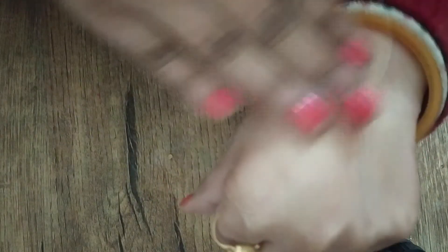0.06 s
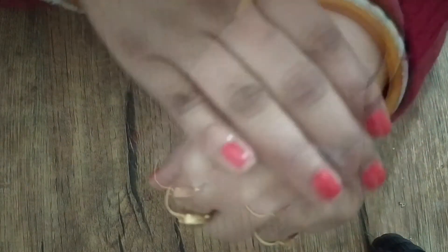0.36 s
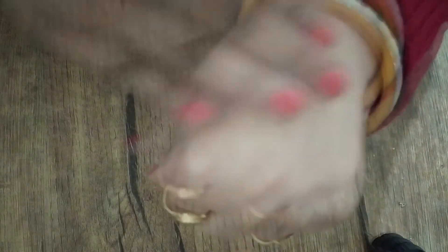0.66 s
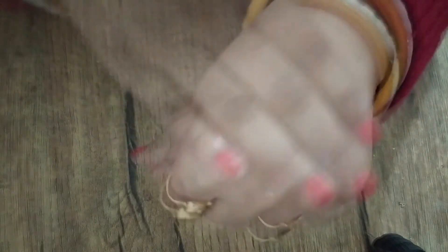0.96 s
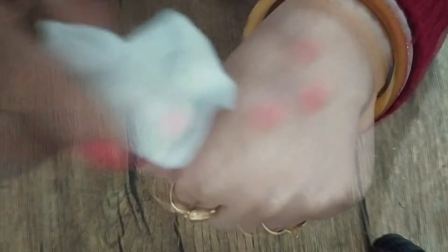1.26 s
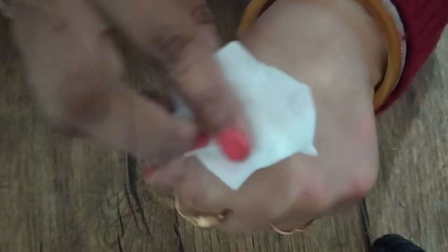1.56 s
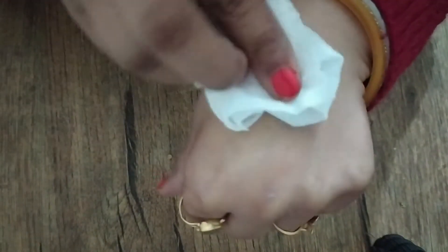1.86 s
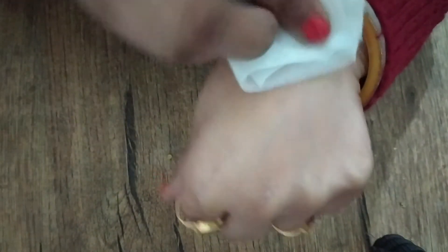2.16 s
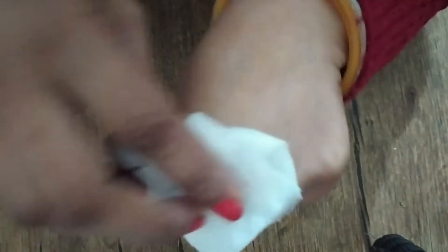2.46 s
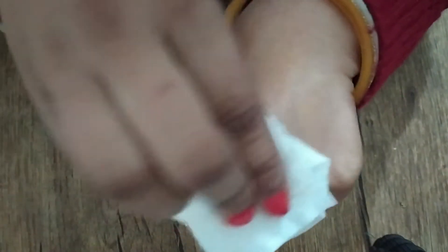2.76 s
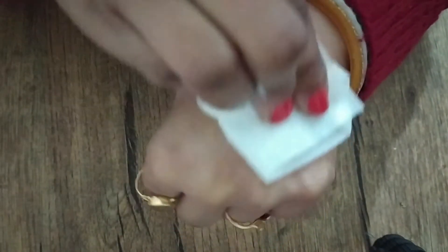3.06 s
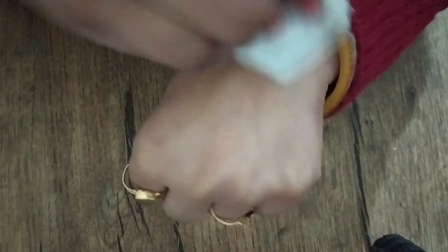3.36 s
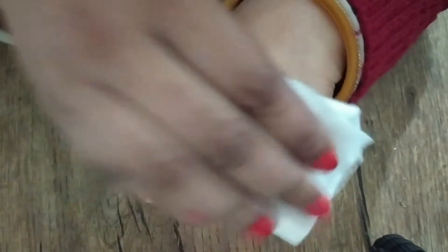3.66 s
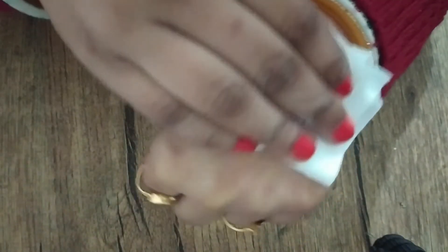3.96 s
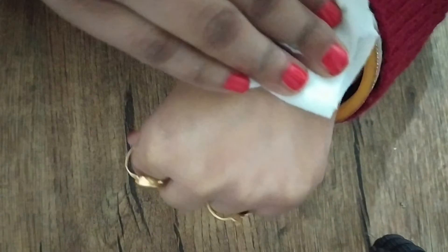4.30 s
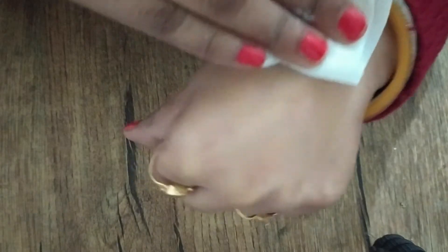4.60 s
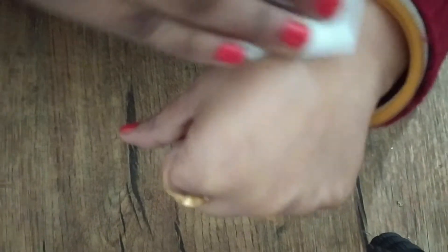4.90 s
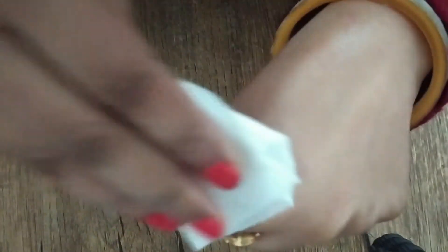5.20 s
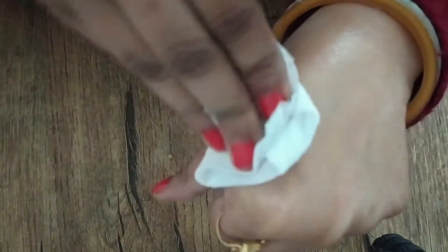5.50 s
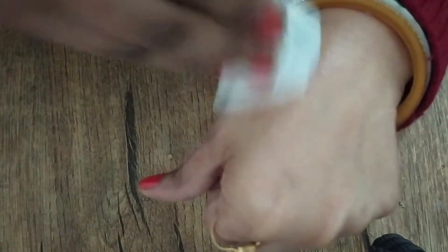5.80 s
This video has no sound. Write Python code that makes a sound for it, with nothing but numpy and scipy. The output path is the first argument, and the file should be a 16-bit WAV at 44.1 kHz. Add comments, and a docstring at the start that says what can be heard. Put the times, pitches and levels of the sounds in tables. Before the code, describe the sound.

A quiet, close stereo sound in a small room with a faint low hum. From the start to about 1.3 seconds, bare fingers spread cream over a hand in soft, dull, swishing strokes, while the wooden table rumbles and drones faintly under the forearms. At 0.9 seconds the table takes one clear, soft bump. Bangles clink lightly around 1.2 seconds, high and short, damped by the wrist. From about 1.8 seconds a tissue wipes the skin in uneven strokes, two or three a second, with a papery rasp and fine hiss. The bangles jangle most strongly from 2.3 to 2.5 seconds and again from 3.5 to 3.7, slightly to the left. The wiping turns gentler after 4 seconds, with a brighter stroke at 5. A few more clinks come around 5.3 seconds, and a last scratchy wipe near 5.9.

```python
"""Hand cream, tissue and bangles

Close up in a small room, on a spaced pair of microphones. A hand spreads cream over the back of the
other, then wipes it off with a tissue: skin and paper fibres rub in strokes of tiny slips. Bangles
clink and jangle as the arm moves, damped by the wrist. The wooden table rumbles under the forearms
and takes one clear bump. A faint room hum lies underneath."""
import sys
import numpy as np
from scipy import signal
from scipy.fft import rfft, irfft, next_fast_len
from scipy.io import wavfile
from scipy.ndimage import uniform_filter1d

SR = 44100
rng = np.random.default_rng(int(sys.argv[2]) if len(sys.argv) > 2 else 0)


def inscribe(sig):
    """Save sig as 16-bit PCM at rate SR to the path in sys.argv[1].

    A 1-D sig is mono; a 2-D sig holds one channel per row.
    Samples are clipped to [-1, 1] before scaling.
    """
    pcm = np.round(np.clip(np.atleast_2d(sig).T, -1, 1) * 32767)
    wavfile.write(sys.argv[1], SR, pcm.astype(np.int16))


N = 261998

# how alike the two microphones hear a noise: (frequency [Hz], correlation [-1 to 1])
MIC_CORRELATION = [(25, 0.0043), (70, 0.6), (200, 0.45), (400, 0.37), (700, 0.21), (1500, -0.036),
                   (9000, 0.0041), (16000, 0.051)]
# room tone: (frequency [Hz], relative density [dB])
ROOM_SPECTRUM = [(15, 17), (36, -9.5), (70, -13.5), (101, -9), (168, -15.5), (446, -19.5), (759, -21.5),
                 (1400, -28), (2460, -27.5), (5230, -32), (7500, -35.5), (9400, -33), (11500, -33.5),
                 (13000, -44), (15500, -57)]
# hum in the room: (frequency [Hz], level [dB], resonator width [Hz])
HUM_BANDS = [(57.8, -69.5, 12), (109.6, -81, 5.9), (162.9, -70.5, 14.7)]
# forearms shifting on the table: (time [s], half length [s], relative level [dB])
FOREARM_SHIFTS = [(0.1, 0.85, -56), (1.123, 0.058, -50), (2.745, 0.18, -54), (4.732, 0.043, -53),
                  (5.84, 0.064, -59)]
# their rumble: (frequency [Hz], relative density [dB])
FOREARM_SPECTRUM = [(22, -10), (40, 4), (56, 20.5), (85, 4), (120, 3.5), (200, -28)]
# the table droning under the rubbing: (peak time [s], half length [s], frequency [Hz], level [dB])
TABLE_DRONES = [(0.155, 0.093, 113.1, -56.5), (0.374, 0.035, 149, -50.5), (0.513, 0.11, 110, -54.5),
                (0.578, 0.048, 150.2, -46), (0.82, 0.18, 155, -55.5), (1.02, 0.089, 170, -52.5),
                (1.2, 0.046, 148, -58), (1.538, 0.065, 149.6, -60), (1.96, 0.067, 163, -57),
                (2.332, 0.22, 165.3, -61.5), (2.82, .07, 99.8, -61), (3.816, .014, 180, -51.5),
                (4.168, 0.12, 194, -62), (4.904, 0.089, 148.5, -58), (4.987, 0.14, 106.7, -59.5),
                (5.089, 0.12, 55.6, -52.5), (5.816, 0.041, 54, -50), (5.866, 0.094, 195.8, -63)]
# bumps on the table: (time [s], relative wood level [dB], relative click level [dB])
TABLE_BUMPS = [(0.708, -53, -46), (0.812, -67, -44), (0.9, -29.5, -35)]
# modes of the wooden top: (frequency [Hz], relative level [dB], t60 [s])
TABLE_MODES = [(191, -10, 0.32), (227, 8.5, 0.043), (327, 8.5, 0.05), (366, 9, 0.083), (437, -20, 0.1),
               (521, -12.5, 0.33), (577, -13.5, 0.46), (660, -16, 0.12), (795, -9, 0.24), (1068, -8, 0.17),
               (1160, -15, 0.12), (2390, -25, .04)]
# bangle modes: (frequency [Hz], relative level [dB], ring [0 main, 1 high], share of ring time [0-1])
BANGLE_MODES = [(1583, -38.5, 0, 0.98), (5465, -23.5, 0, 0.8), (9170, -4, 0, 0.5), (9385, 0, 0, 0.84),
                (9590, -12, 0, 0.66), (10200, -17, 0, 0.2), (11120, -23, 0, 0.2), (13300, -29, 0, 0.5),
                (8160, -19.5, 1, 0.53), (10660, -6, 1, 0.45), (11680, -11.5, 1, 0.82),
                (11820, -6.5, 1, 0.48), (11920, -9.5, 1, .9), (12400, -14, 1, 0.27), (13100, -18, 1, .4)]
# single bangle contacts, levels relative:
# (time [s], main ring [dB], high ring [dB], tick [dB], left minus right [dB], ring time [s])
BANGLE_CLINKS = [(0.1166, -54, -54, -54, 5, 0.0066), (0.3876, -54, -42, -42.5, 0, 0.018),
                 (0.5282, -54, -60, -53, 0, .006), (0.844, -46, -60, -51, -4, 0.0045),
                 (0.9005, -39, -60, -38, -5, 0.0082), (0.9617, -45, -63, -56, -8, .006),
                 (1.0475, -54, -40, -54, 4, 0.0087), (1.077, -50, -52, -45, -4, .005),
                 (1.1463, -31.5, -52, -32, -11, 0.0053), (1.1967, -29, -36, -48, -9, 0.011),
                 (1.2142, -30, -15.5, -34, 2, 0.0084), (1.2225, -44, -22, -50, 0, 0.0074),
                 (1.257, -31, -48, -50, -2, 0.0066), (1.278, -25.5, -45, -34, -6.5, 0.019),
                 (1.2941, -46, -20, -47, 6, 0.004), (1.383, -35.5, -57, -41, 1, .007),
                 (1.3981, -36.5, -55, -46, 7, 0.0063), (1.6586, -35, -60, -42, -5, 0.0057),
                 (1.7801, -34, -46, -57, -10, 0.0073), (1.788, -32, -52, -51, -12, 0.006),
                 (1.841, -35, -48, -36, -2, 0.007), (2.1186, -38, -68, -36, -14.5, 0.015),
                 (2.222, -37, -54, -38, 3, .005), (2.309, -19.5, -37, -18, -9.5, 0.012),
                 (2.3172, -33, -36, -45, -4, .005), (2.3215, -36, -42, -44, -6, .005),
                 (2.3343, -29, -23, -35, 4, 0.0077), (2.3403, -33, -27, -36, -1, .008),
                 (2.3635, -46, -33, -46, 0, .007), (2.3757, -34, -50, -40, -4, 0.0044),
                 (2.3838, -26.5, -27, -38, 2, 0.016), (2.393, -21.5, -37, -28, -9, 0.005),
                 (2.3952, -24, -32, -40, -5, 0.017), (2.3982, -24, -26, -39, 0, 0.014),
                 (2.405, -28, -40, -37, -13, 0.017), (2.4125, -20, -34, -23.5, -7, 0.011),
                 (2.4173, -29, -21.5, -39, -1, 0.018), (2.4238, -24, -34, -37, -8, 0.011),
                 (2.428, -24, -25, -35, -10, 0.01), (2.444, -19, -40, -45, -7, 0.0077),
                 (2.4498, -23, -48, -46, -11, 0.0075), (2.4875, -13.5, -33, -32, -9.5, 0.0052),
                 (2.545, -23, -48, -26, -2, 0.014), (2.9572, -36.5, -38, -42, 9, 0.0065),
                 (3.357, -38, -52, -50, -10, 0.0085), (3.4756, -26.5, -38, -49, -8, 0.024),
                 (3.4825, -25, -34, -30.5, -12, 0.011), (3.4868, -24.5, -37, -42, -12.5, 0.015),
                 (3.5, -31, -42, -43, -13, 0.0037), (3.509, -42, -16.5, -25.5, -4, 0.006),
                 (3.5333, -25.5, -32, -34, -8.5, 0.019), (3.541, -27, -39, -46, -13, 0.011),
                 (3.5858, -16.5, -28, -26, 2, .010), (3.594, -22.5, -41, -39, -3, 0.015),
                 (3.6495, -11.5, -38, -34, -12.5, 0.023), (3.6575, -26, -35, -46, -4, 0.0056),
                 (3.786, -28.5, -60, -50, -2, 0.0052), (3.936, -54, -74, -60, -3, 0.0093),
                 (4.3106, -44.5, -66, -58, -8, 0.0078), (5.128, -34, -34, -40, -5, 0.0083),
                 (5.2889, -18, -38, -38, -10.5, 0.013), (5.3405, -15.5, -31, -40, -6, 0.0043),
                 (5.3737, -31, -56, -56, -10, 0.0057), (5.436, -36, -67, -50, -6, 0.008)]
# spells of bangles chattering together: (start [s], end [s], relative level [dB])
BANGLE_JANGLES = [(1.229, 1.254, -56), (2.355, 2.372, -47), (2.419, 2.439, -22), (3.548, 3.588, -33)]
# fingers on creamed skin: (fastest time [s], half length [s], relative body level [dB], swish [dB])
FINGER_STROKES = [(0.01, 0.077, -51, -59.5), (0.217, 0.08, -50, -64.5), (0.38, 0.095, -49.5, -67.5),
                  (0.548, 0.063, -51, -88), (0.713, 0.027, -48, -71), (1.004, 0.094, -49, -57.5),
                  (1.17, 0.17, -56, -61), (2.66, 0.14, -87, -58.5), (4.864, 0.15, -55, -70.5)]
# their soft body and narrow swish: (frequency [Hz], relative density [dB])
BODY_SPECTRUM = [(60, -26), (100, -3.5), (170, 2), (230, -4.5), (400, -15), (580, -5.5), (750, -22),
                 (1100, -51)]
SWISH_SPECTRUM = [(1500, -6), (1880, 1), (2130, -2), (2370, 9.5), (2520, 3.5), (2800, -6), (4000, -32)]
# brief scratches of skin, paper or bangles, and the table ringing hollowly under the rubbing:
# (time [s], half length [s], frequency [Hz], resonator width [Hz], level [dB])
SCRATCHES_AND_RINGS = [(0.026, 0.038, 3970, 940, -63.5), (0.708, 0.003, 2400, 600, -54.5),
                       (0.82, 0.021, 2100, 1500, -55.5), (2.3775, 0.0052, 2550, 2200, -48.5),
                       (2.375, .0018, 5200, 2000, -46), (2.337, .02, 12300, 1600, -47),
                       (2.423, 0.013, 11000, 1400, -51), (2.83, 0.053, 275, 31, -54.5),
                       (2.675, 0.11, 703, 85, -61), (2.815, 0.028, 300, 200, -56),
                       (3.5018, 0.0023, 4700, 790, -41), (3.552, .035, 11500, 800, -49),
                       (3.583, 0.0023, 2600, 3200, -48), (3.581, .009, 5300, 2500, -50),
                       (4.88, 0.082, 11500, 1700, -65), (5.85, 0.054, 4800, 1100, -60.5),
                       (5.915, 0.018, 4950, 1300, -46), (5.91, 0.02, 3000, 1600, -56),
                       (5.913, 0.036, 9100, 1400, -45)]
# rubbing strokes, bare hand on creamed skin first, then the tissue wiping; levels relative:
# (fastest time [s], swell [s], fade [s], hiss [dB], rasp offset [dB], skin offset [dB])
RUBBING_STROKES = [(0.02, 0.031, 0.11, -64.5, -13, 11.5), (0.3, 0.17, 0.4, -69.5, 3.5, 9.5),
                   (0.729, 0.045, 0.047, -62, -1, 4.5), (0.82, 0.052, 0.055, -57, -22, 8.5),
                   (1.03, 0.086, 0.22, -61, 6, 6), (1.73, 0.24, 0.11, -60, -2.5, -1.5),
                   (1.884, 0.039, 0.044, -45.5, -12, -9), (2.116, 0.042, 0.026, -51.5, 0, -10),
                   (2.3, 0.051, 0.016, -46.5, -11, -20), (2.399, 0.1, 0.068, -45.5, -6.5, -4.5),
                   (2.58, 0.052, 0.15, -53, 1, -6), (2.689, 0.089, 0.058, -50.5, -5.5, 5.5),
                   (2.83, 0.03, 0.051, -55, 0, 2), (3.034, 0.049, 0.052, -50.5, -3.5, -5.5),
                   (3.24, 0.052, 0.054, -55, 1, -10), (3.413, 0.028, 0.1, -43, -6.5, -11),
                   (3.59, 0.029, 0.066, -47, -5, -7), (3.82, 0.28, 0.19, -60.5, -8, 6.5),
                   (4.17, 0.076, 0.053, -55.5, -4.5, -4), (4.468, 0.077, 0.04, -57, -5.5, -14.5),
                   (4.68, 0.057, 0.09, -59, 0, -2), (4.83, 0.052, 0.082, -57.5, -1, -1.5),
                   (5.015, 0.058, 0.05, -48, -6, -6), (5.16, 0.082, 0.058, -57.5, 1.5, -9),
                   (5.36, 0.097, 0.12, -64, 4.5, -7), (5.53, 0.06, 0.048, -56.5, -6.5, -18),
                   (5.894, 0.077, 0.06, -46, -1.5, -5)]
# rubbed skin, rasping paper, hissing fibres, snapping folds: (frequency [Hz], relative density [dB])
SKIN_SPECTRUM = [(90, 0.5), (170, 8), (280, 4.5), (480, 0), (750, 0.5), (1300, -6), (2000, -10),
                 (3200, -12), (6000, -29)]
RASP_SPECTRUM = [(900, -7), (1700, -6), (2500, -3.5), (3600, -5), (4800, -4.5), (6200, -8.5), (8000, -6.5),
                 (12000, -28)]
FIBRE_SPECTRUM = [(3500, -24.5), (6000, -17.5), (7800, -12.5), (8700, -5.5), (9350, -6.5), (10100, -7),
                  (11000, -16), (12000, -27), (13200, -22), (15500, -34.5)]
CRINKLE_SPECTRUM = [(3000, -13), (5000, -11.5), (7000, -7), (9000, -1.5), (10500, 1.5), (12200, -15),
                    (14000, -25.5)]


def from_db(db):
    """Decibels to gain."""
    return 10 ** (np.asarray(db) / 20)


def unit_rms(x):
    """Scale to an rms of 1."""
    return x / np.sqrt(np.mean(x ** 2) + 1e-20)


def at_hz(points, hz):
    """Read a curve on a log-frequency axis."""
    point_hz, values = np.transpose(points)
    return np.interp(np.log(hz + 1), np.log(point_hz), values)


def panned(pan_db):
    """Gains at the two microphones, the left louder by pan_db."""
    return from_db(np.array([[.5], [-.5]]) * pan_db)


def add(out, s, sound):
    """Mix a short sound in at time s."""
    at = round(s * SR)
    out[..., at:at + sound.shape[-1]] += sound[..., :N - at]


def drift(turns_per_s):
    """A smooth random wander with a spread of 1."""
    knots = rng.standard_normal(N // 20)
    return np.interp(np.arange(N) / SR * turns_per_s, np.arange(len(knots)), knots) / np.sqrt(2 / 3)


def resonance(x, hz, width_hz, passes=1):
    """Two-pole resonance with gain 1 at its peak; more passes steepen its skirts."""
    r = np.exp(-np.pi * width_hz / SR)
    feedback = [1, -2 * r * np.cos(2 * np.pi * hz / SR), r * r]
    for _ in range(passes):
        x = signal.lfilter(np.array([1, 0, -1]) * (1 - r * r) / 2, feedback, x)
    return x


def coloured(white_pair, spectrum):
    """Shape two white signals to a spectrum, partly alike at the microphones in the bass; rms 1."""
    size = next_fast_len(N)
    hz = np.arange(size // 2 + 1) * SR / size
    alike = at_hz(MIC_CORRELATION, hz)
    roll_off = np.minimum(1, hz / spectrum[0][0]) ** 2 / np.maximum(1, hz / spectrum[-1][0]) ** 2
    mid, side = rfft(white_pair, size) * from_db(at_hz(spectrum, hz)) * roll_off
    mid, side = irfft([mid * np.sqrt(1 + alike), side * np.sqrt(1 - alike)], size)[:, :N]
    return unit_rms(np.array([mid + side, mid - side]))


def swells(times, rises, falls, levels_db, edge):
    """Gain of a run of gestures, their powers added; a higher edge makes each die away more steeply."""
    t = np.arange(0, N, 40) / SR
    power = sum(from_db(db) ** 2 / (1 + np.maximum((s - t) / rise, (t - s) / fall) ** edge) ** 2
                for s, rise, fall, db in zip(times, rises, falls, levels_db))
    return np.interp(np.arange(N) / SR, t, np.sqrt(power))


def friction(spectrum, slips_per_s, spread_db, hiss, judder_db, judder_hz):
    """Tiny slips of uneven size over a smooth hiss; the grip judders as the hand slides."""
    sizes = from_db(spread_db * np.minimum(rng.exponential(1, (2, N)), 4))
    slips = (rng.random((2, N)) < slips_per_s / SR) * sizes * rng.choice([-1, 1], (2, N))
    grain = unit_rms(slips) + hiss * rng.standard_normal((2, N))
    return unit_rms(coloured(grain, spectrum) * from_db(judder_db * drift(judder_hz)))


def reflections(x, t60, gap_s):
    """The near walls answer after a short gap, differently at each microphone."""
    t = np.arange(int(SR * .7)) / SR
    tail = rng.standard_normal((2, len(t))) * from_db(-60 * t / t60) * np.clip(t / gap_s - 1, 0, 1)
    tail /= np.sqrt(np.sum(tail ** 2, axis=1, keepdims=True))
    return signal.fftconvolve(x[None], tail, axes=1)[:, :N]


def room_tone(noise_db=-52):
    """Steady noise all round the microphones, with a wavering hum in the centre."""
    noise = from_db(noise_db) * coloured(rng.standard_normal((2, N)), ROOM_SPECTRUM)
    hum = sum(from_db(db) * unit_rms(resonance(rng.standard_normal(N), hz, width, passes=2))
              for hz, db, width in HUM_BANDS)
    return noise + hum


def forearms(rest_db=-67.5):
    """The shifting forearms rumble through the table, faintly even at rest."""
    s, half_s, level_db = np.transpose(FOREARM_SHIFTS)
    gain = np.hypot(swells(s, half_s, half_s, level_db - 9, edge=6.5), from_db(rest_db))
    return gain * coloured(rng.standard_normal((2, N)), FOREARM_SPECTRUM)


def table_drones(waver_hz=2.62):
    """Stick and slip of the skin feeds low resonances of the table, which swell as wavering tones."""
    t, out = np.arange(N) / SR, 0
    wander = waver_hz * drift(turns_per_s=18)
    for s, half_s, hz, level_db in TABLE_DRONES:
        tone = np.sin(2 * np.pi * np.cumsum(hz + wander) / SR)
        out += from_db(level_db) * tone / (1 + ((t - s) / half_s) ** 4)
    return out * panned(-1)


def table_bumps(rise_s=0.00079, click_t60=0.044, thud_t60=0.19):
    """Two faint touches and a soft bump ring the wooden top, each with a rough thud and a light click."""
    t = np.arange(int(SR * .4)) / SR
    attack = 1 - np.exp(-t / rise_s)
    wood = sum((-1) ** k * from_db(db - 60 * t / t60) * np.sin(2 * np.pi * hz * t)
               for k, (hz, db, t60) in enumerate(TABLE_MODES))
    out = np.zeros(N)
    for s, wood_db, click_db in TABLE_BUMPS:
        burst = rng.standard_normal(len(t)) * from_db(7.5 - 60 * t / thud_t60)
        thud = resonance(resonance(burst, 530, 720), 530, 660)
        click = resonance(rng.standard_normal(len(t)) * from_db(-60 * t / click_t60), 2270, 890)
        add(out, s, from_db(wood_db - 8.5) * (wood + thud) * attack + from_db(click_db + 1.5) * click)
    return out + from_db(-4) * reflections(out, t60=0.28, gap_s=0.0014)


def jangle_knocks(knocks_per_s=220, ring_s=0.0043):
    """Light, uneven contacts within each jangle, left of centre, as rows like BANGLE_CLINKS."""
    rows = []
    for start, end, db in BANGLE_JANGLES:
        for k, (jitter, brightness, side) in enumerate(rng.uniform(-1, 1, (16, 3))):
            s = start + (k + .5 + .5 * jitter) / knocks_per_s
            if s < end:
                rows.append((s, db, db + 5 * brightness, db - 20, 9 + 6 * side, ring_s))
    return rows


def wrist_damping(t, ring_s, rise_s=0.0011, choke=2.6, shimmer_t60=0.12, free_ring_s=0.02):
    """Envelope of each bangle mode: the wrist chokes it within milliseconds, leaving a faint shimmer."""
    _, _, is_high, share = np.transpose(BANGLE_MODES)[:, :, None]
    age = np.minimum(t / (ring_s * share), 2)
    # a contact damped early leaves a weaker shimmer in the main ring
    loss_db = 4 * max(1 - ring_s / free_ring_s, 0)
    shimmer_db = np.where(is_high, -19, -29 - loss_db)
    shimmer = share ** 2 * from_db(shimmer_db - 60 * t / shimmer_t60)
    return (1 - np.exp(-t / rise_s)) * (from_db(-60 * age ** choke) + shimmer)


def bangle_ring(t, main_db, high_db, ring_s, hard_db=-12, detune_cycles=0.72):
    """A struck bangle rings in its modes, a little differently at every contact."""
    hz, mode_db, is_high, _ = np.transpose(BANGLE_MODES)
    # the point of contact changes the weak modes most
    scatter_db = np.minimum(.3 - mode_db / 10, 1.3) * rng.standard_normal(len(hz))
    # only a hard contact bends the whole bangle in its low modes
    bend_db = 0.12 * (main_db - hard_db) * (hz < 6000)
    strength = from_db(mode_db + np.where(is_high, high_db, main_db) + bend_db + scatter_db)
    # harder damping pulls the modes further off pitch
    pitch = hz + detune_cycles / ring_s * rng.standard_normal(len(hz))
    # the microphones stand several wavelengths apart and meet each mode out of step
    phase = rng.uniform(0, np.pi / 2, len(hz))
    mic_phase = phase + np.pi / 4 * np.array([[1], [-1]]) * rng.choice([-1, 1], len(hz))
    modes = np.sin(2 * np.pi * pitch[:, None] * t + mic_phase[:, :, None])
    return strength @ (wrist_damping(t, ring_s) * modes)


def bangle_buzz(t, ring_s, full_depth=0.85, bandwidth_hz=420):
    """Gain that roughens the dying ring as the settled bangles tremble against each other."""
    lowpass = signal.butter(2, bandwidth_hz, fs=SR, output="sos")
    tremble = unit_rms(signal.sosfilt(lowpass, rng.standard_normal((2, len(t)))))
    depth = full_depth * np.minimum(t / ring_s, 1) ** 2
    return np.sqrt(1 - depth ** 2) + depth * tremble


def bangle_tick(t, tick_db, crack_s=0.00069, scuff_t60=0.02, top_hz=12600):
    """Bangles meet with a hard crack, then a short scuff; the contact time limits the treble."""
    crack = from_db(-5) * (t < crack_s)
    scuff = from_db(-60 * t / scuff_t60) * (t < .05) + 1e-18
    snap = rng.standard_normal((2, len(t))) * from_db(tick_db) * (crack + scuff)
    tick = resonance(snap, 10200, 4800, passes=2) - 0.29 * resonance(snap, 6070, 2800)
    clack = from_db(-20) * resonance(snap, 2600, 1800)
    return signal.sosfilt(signal.butter(6, top_hz, fs=SR, output="sos"), tick + clack)


def bangles():
    """Each contact ticks and rings close to the microphones, with a little of the room behind it."""
    t = np.arange(int(SR * .15)) / SR
    direct, to_room = np.zeros((2, N)), np.zeros(N)
    for s, main_db, high_db, tick_db, pan_db, ring_s in BANGLE_CLINKS + jangle_knocks():
        ring = bangle_ring(t, main_db, high_db, ring_s) * bangle_buzz(t, ring_s)
        clink = ring + bangle_tick(t, tick_db)
        add(direct, s, clink * panned(pan_db))
        add(to_room, s, clink[0])
    return direct + from_db(-8) * reflections(to_room, t60=0.35, gap_s=0.0022) * panned(-2.2)


def fingers(edge=2.6):
    """Bare fingers glide on the cream with a soft body and a narrow swish."""
    s, half_s, body_db, swish_db = np.transpose(FINGER_STROKES)
    body = friction(BODY_SPECTRUM, slips_per_s=280, spread_db=0.5, hiss=1.4, judder_db=1.5, judder_hz=10)
    swish = friction(SWISH_SPECTRUM, slips_per_s=1400, spread_db=-7, hiss=3.5,
                     judder_db=2.5, judder_hz=75)
    return (body * swells(s, half_s, half_s, body_db - 3, edge)
            + swish * swells(s, half_s, half_s, swish_db, edge))


def scratches_and_rings():
    """Skin, paper or bangles scratch briefly, and the table rings hollowly under the rubbing."""
    t, out = np.arange(N) / SR, 0
    for s, half_s, hz, width_hz, level_db in SCRATCHES_AND_RINGS:
        band = unit_rms(resonance(rng.standard_normal((2, N)), hz, width_hz, passes=2))
        out += from_db(level_db) * band / (1 + ((t - s) / half_s) ** 4)
    return out


def shifting_folds(x, depth_db=2.5, full_depth_hz=3000):
    """The treble's colour shifts from moment to moment as different folds come into contact."""
    hz, _, frames = signal.stft(x, SR, nperseg=512)
    patches = uniform_filter1d(rng.standard_normal(frames.shape[1:]), size=5, axis=0)
    patches = unit_rms(uniform_filter1d(patches, size=4, axis=1))
    colour_db = depth_db * np.minimum(hz / full_depth_hz, 1)[:, None] * patches
    return signal.istft(frames * from_db(colour_db), nperseg=512)[1][:, :N]


def rubbing(tissue_landed_s=1.78, landing_s=0.96):
    """The bare hand, then the tissue, rubs the skin dully; the paper rasps, crinkles and hisses."""
    s, rise, fall, hiss_db, rasp_db, skin_db = np.transpose(RUBBING_STROKES)
    tissue_contact = np.clip((np.arange(N) / SR - tissue_landed_s) / landing_s + 1, 0, 1)

    def strokes(levels_db, rest_db):
        """Gain of the rubbing; once it has landed, the tissue never quite stops moving."""
        return np.hypot(swells(s, rise, fall, levels_db, edge=2.3), tissue_contact * from_db(rest_db))

    skin = friction(SKIN_SPECTRUM, slips_per_s=900, spread_db=2.5, hiss=1, judder_db=0.97, judder_hz=48)
    rasp = friction(RASP_SPECTRUM, slips_per_s=700, spread_db=0, hiss=0.83, judder_db=0.6, judder_hz=84)
    fibres = friction(FIBRE_SPECTRUM, slips_per_s=1000, spread_db=-1, hiss=1, judder_db=1, judder_hz=92)
    crinkle = friction(CRINKLE_SPECTRUM, slips_per_s=300, spread_db=-2.5, hiss=0.09,
                       judder_db=3, judder_hz=43)
    skin *= strokes(hiss_db + skin_db - 4, rest_db=-61)
    rasp *= strokes(hiss_db + rasp_db - 4, rest_db=-67)
    rustle = (from_db(1.44) * fibres + from_db(-10) * crinkle) * strokes(hiss_db, rest_db=-101)
    return (skin + rasp) * panned(-1.05) + rustle * panned(-3)


def scene():
    """Hands, bangles, table and room as they reach the pair of microphones."""
    hands = shifting_folds(rubbing() + scratches_and_rings()) + fingers()
    return hands + table_drones() + forearms() + bangles() + table_bumps() + room_tone()


def record(dry, cutoff_hz=15800):
    """A steep high cut on both microphone channels."""
    return signal.sosfilt(signal.ellip(10, .1, 80, cutoff_hz, fs=SR, output="sos"), dry)


dry = scene()
out = record(dry)
inscribe(out)
```